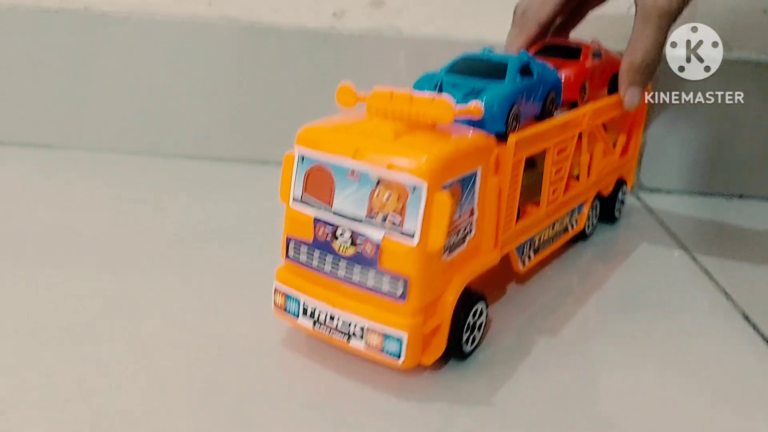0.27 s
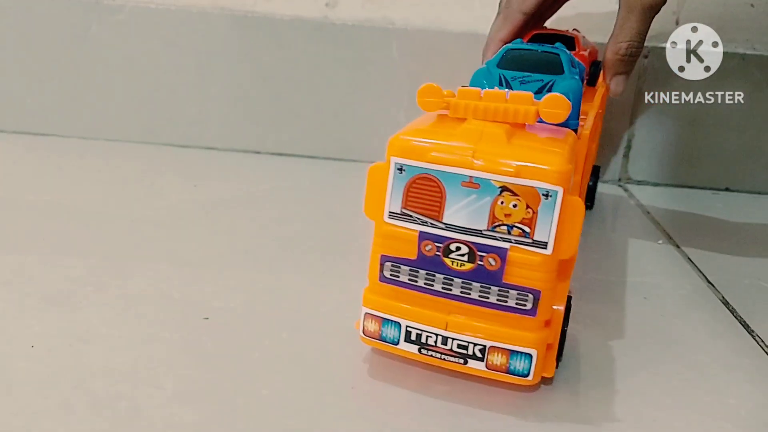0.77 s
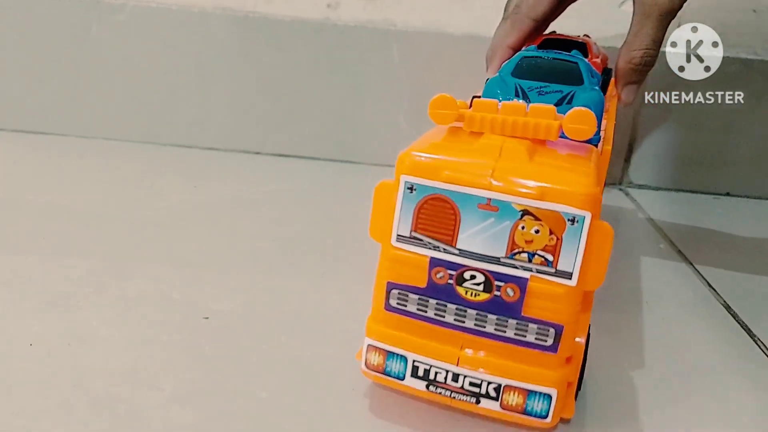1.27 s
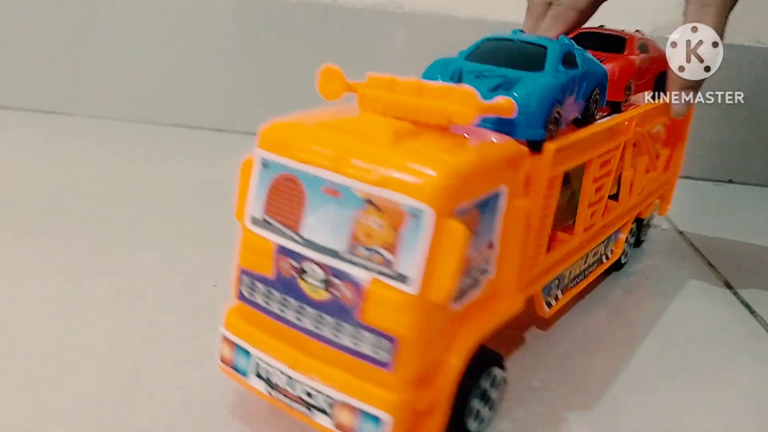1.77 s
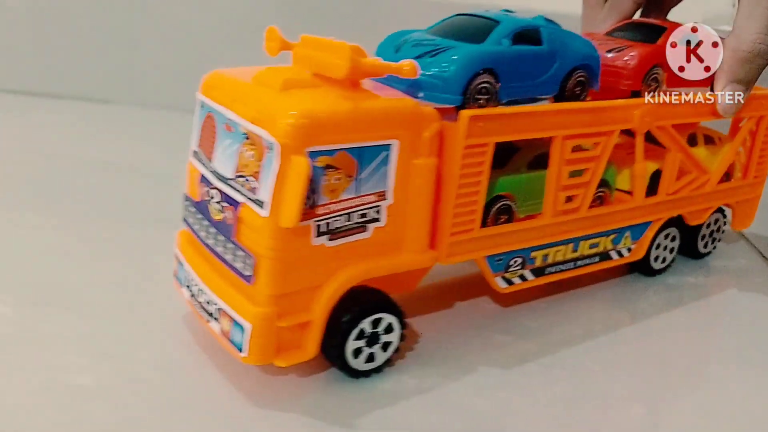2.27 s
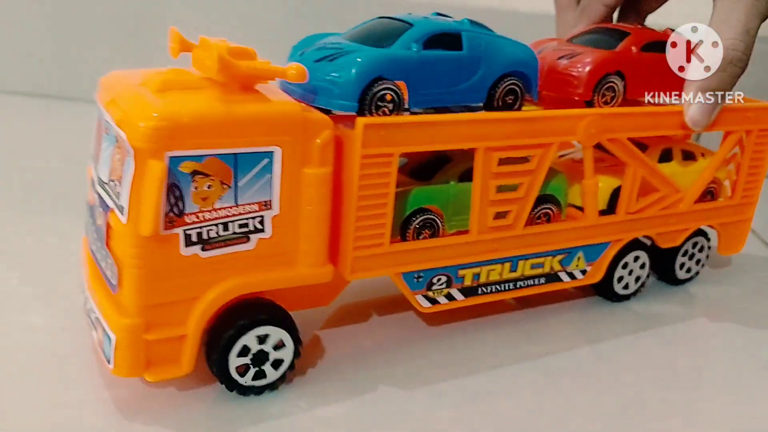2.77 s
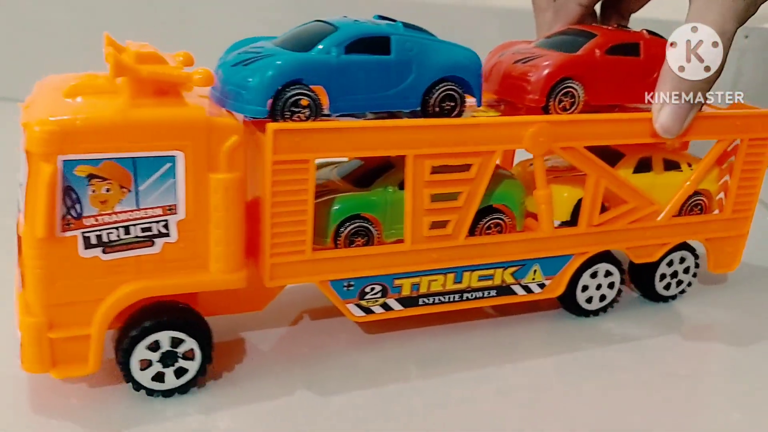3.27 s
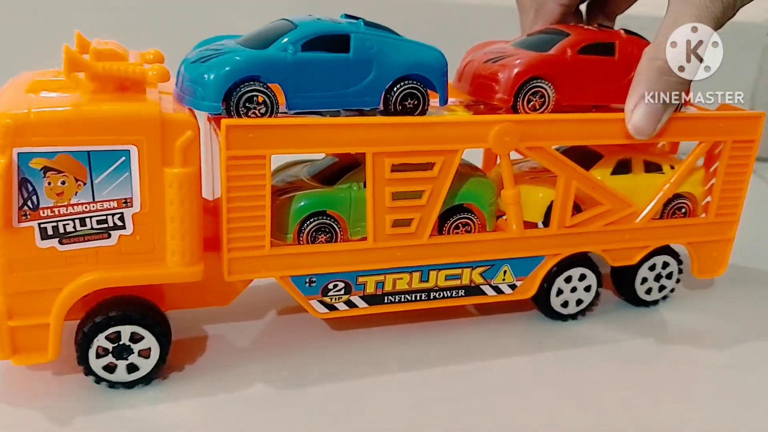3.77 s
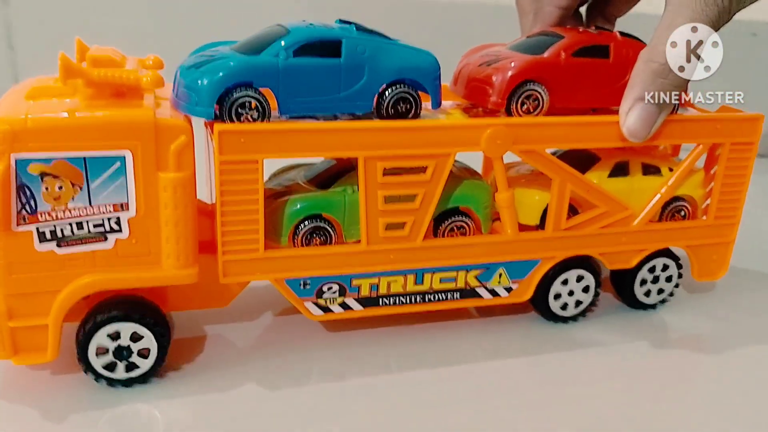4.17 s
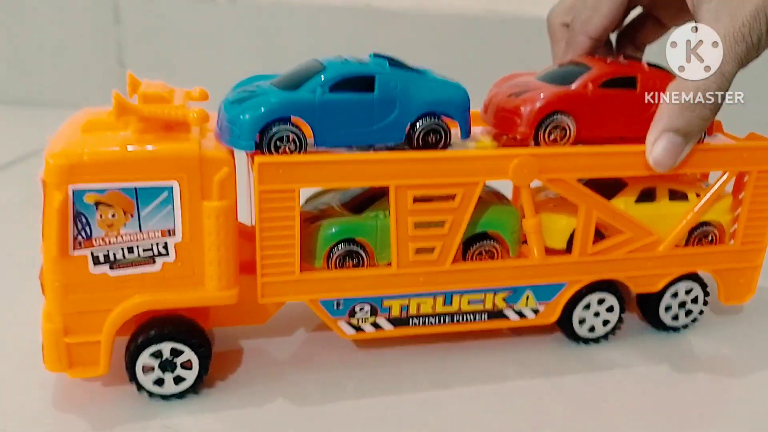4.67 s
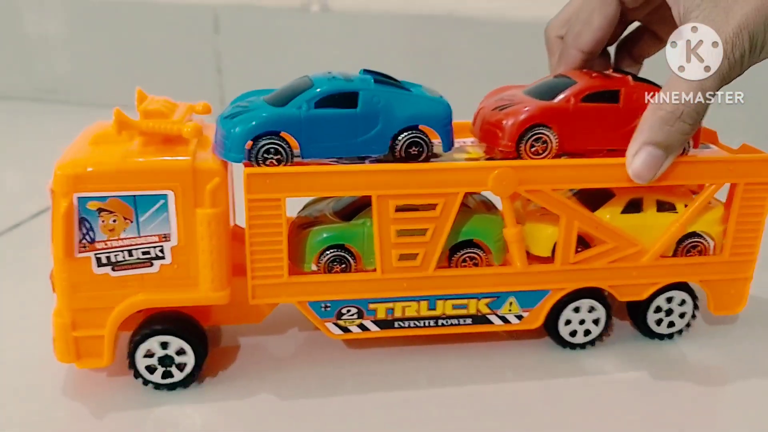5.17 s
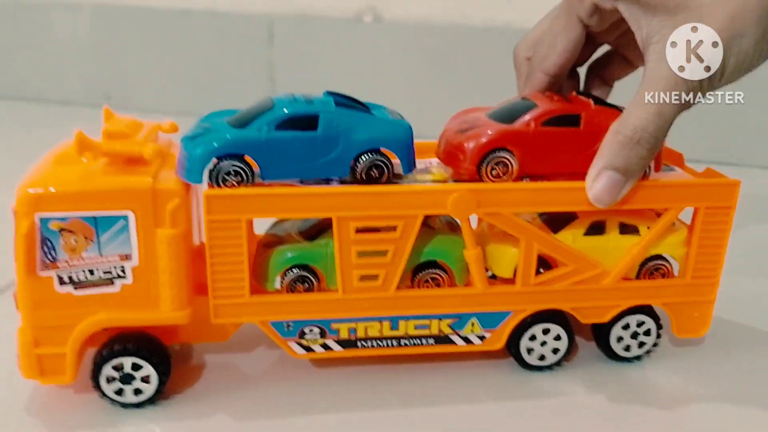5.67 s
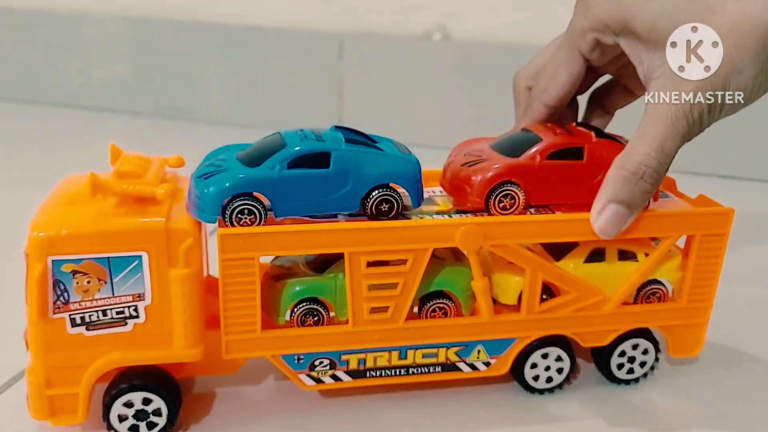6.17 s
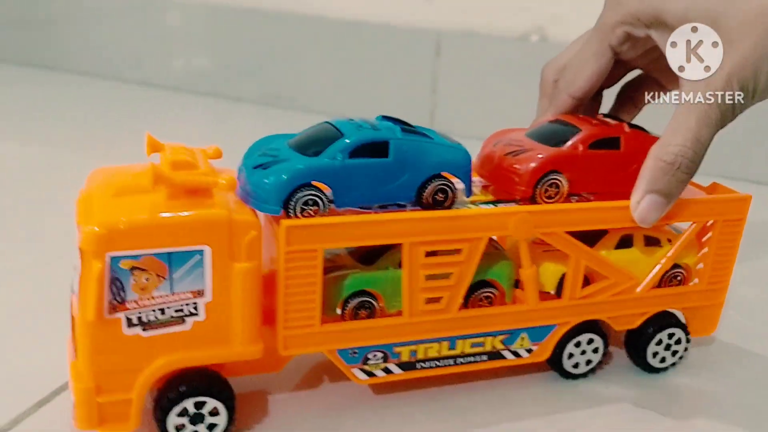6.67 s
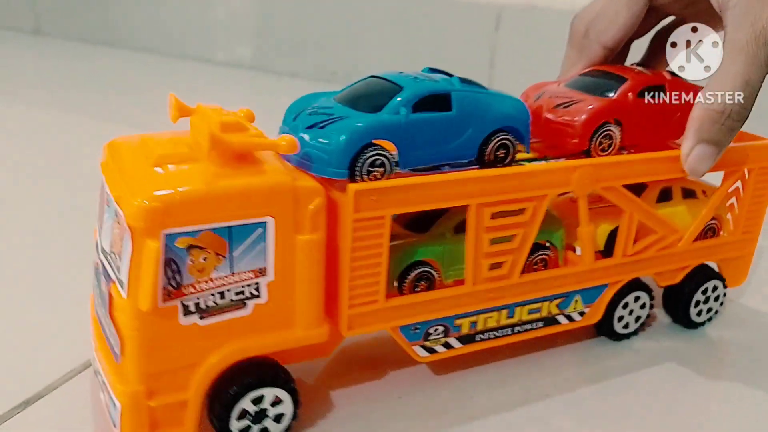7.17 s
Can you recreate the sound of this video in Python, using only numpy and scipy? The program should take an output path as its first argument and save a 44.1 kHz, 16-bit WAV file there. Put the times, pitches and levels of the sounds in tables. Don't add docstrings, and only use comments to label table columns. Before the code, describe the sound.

A hand-pushed plastic toy truck rolls close to a stereo pair of microphones on tiles in a small, live room. Soft wheel rumble and faint hiss continue throughout, over a low fan hum and irregular draught buffeting. Two knocks and scuffs open at 0.1 s, then the hitch creaks around 0.35-0.55. Thin high squeaks at about 1.0 lead into a rattling cluster from 1.2 to 1.6. Near 1.9-2.1 come the strongest creaks, squeaks and a knock; a sharp scuff and thump follow at 2.6, then more rattling to 3.2. A calmer stretch has a small high squeak at 3.5. A loud rising squeak at 4.1 precedes dense scuffs and a deep thump near 4.5. Car ticks gather around 4.9 and 5.6, with rattles until 6.2. Faint low squeaks follow around 6.4-6.6, then squeaks, thumps and a bright final clatter at 7.1-7.4.

```python
import sys
import numpy as np
from scipy import signal
from scipy.fft import rfft, irfft, next_fast_len
from scipy.io import wavfile
from scipy.ndimage import uniform_filter1d, map_coordinates

SR = 44100
rng = np.random.default_rng(int(sys.argv[2]) if len(sys.argv) > 2 else 0)


def how_loud(loudness_db):
    steps = np.asarray(loudness_db, float) / 20
    return 10 ** steps


def digitize_waveform(pressure):
    field = np.atleast_2d(pressure).T
    bounded = np.clip(field, -1, 1)
    quanta = np.round(bounded * 32767).astype(np.int16)
    wavfile.write(sys.argv[1], SR, quanta)


N = 327663
T = np.arange(N) / SR

# [t/s, peak/dB, ring f/Hz]
SHELL_TAPS = [(0.1004, -25, 2470), (0.1321, -26.5, 3900), (0.945, -33, 1510), (1.5566, -28, 3460),
              (1.425, -34, 4000), (2.9393, -30, 2150), (2.809, -31, 3000), (4.322, -31, 2600),
              (4.447, -33, 2620), (6.0746, -33, 5700), (1.272, -28, 2310), (1.7526, -32, 2600),
              (1.919, -24, 2300), (2.0354, -34, 2230), (2.556, -23, 2110), (2.731, -33, 2530),
              (2.817, -25, 1780), (3.17, -28, 2430), (4.035, -29, 2920), (4.2318, -28, 1730),
              (4.4754, -23.5, 3040), (4.6887, -30, 2000), (5.5134, -41, 1600), (6.102, -29, 2080),
              (6.204, -28, 2340), (6.9166, -32, 2980), (7.0983, -31, 2680)]
# [t/s, peak/dB, ring f/Hz]
CAR_TICKS = [(1.211, -37, 3820), (1.483, -30, 3770), (3.0774, -26, 3620), (3.454, -37, 3600),
             (4.5755, -25, 3250), (4.855, -29.5, 2980), (4.912, -27, 3210), (5.009, -31, 3040),
             (5.364, -27, 3000), (5.5865, -30, 4130), (5.623, -28.5, 3050), (5.753, -28, 5700),
             (5.9728, -29, 3170), (6.706, -28, 3570), (7.029, -30, 6600), (7.139, -25, 3120),
             (7.24, -27, 3060), (7.269, -19, 3860)]


def unit(x):
    return x / np.sqrt(np.mean(x ** 2) + 1e-20)


def along(points, hz):
    f, v = np.transpose(points)
    return np.interp(np.log(hz + 1), np.log(f + 1), v)


def curve(rows):
    s, value = np.transpose(rows)
    return np.interp(T, s, value)


def wobble(rate_hz, count=N):
    knots = rng.standard_normal(int(count * rate_hz / SR) + 4)
    return map_coordinates(knots, [T[:count] * rate_hz])


def filtered(x, response):
    m = next_fast_len(N + 8192)
    return irfft(rfft(x, m) * response(np.fft.rfftfreq(m, 1 / SR)), m)[..., :N]


def shape(spectrum):
    return lambda hz: how_loud(along(spectrum, hz))


def steep_resonances(modes):
    def gain(f):
        total = 0
        for k, (centre, width, db) in enumerate(modes):
            total = total + (-1) ** k * how_loud(db) * 1j * f * width / (centre ** 2 - f ** 2 + 1j * f * width)
        return np.abs(total) ** 1.5
    return gain


def rush(gain, patchy_db, gritty_db=0):
    # [f/Hz, correlation]
    likeness = [(20, .84), (60, .55), (90, .35), (130, .66), (260, .66), (550, .68), (1150, .52),
                (2400, .45), (5020, .25), (10500, -.2)]
    grit = how_loud(gritty_db * wobble(900))
    z = signal.stft(grit * rng.standard_normal((2, N)), nperseg=512)[2]
    field = uniform_filter1d(rng.standard_normal(z.shape[1:]), size=5, axis=0)
    field = uniform_filter1d(field, size=5, axis=1)
    pair = signal.istft(z * how_loud(patchy_db * unit(field)), nperseg=512)[1][:, :N]

    def mid_side_gain(hz):
        angle = np.arccos(np.clip(along(likeness, hz), -1, 1)) / 2
        return gain(hz) * np.array([np.cos(angle), np.sin(angle)])

    mid, side = filtered(pair, mid_side_gain)
    return unit(np.array([mid + side, mid - side]))


def fan():
    # [f/Hz, level/dB, left minus right/dB]
    motor = (47.65, -26, -.3)
    # [t/s, level/dB]
    gusts = [(0, -27), (.7, -27), (1, -24), (1.5, -26), (2, -23.5), (3.6, -23.5), (4, -26), (4.6, -26),
             (4.9, -22.5), (5.5, -25), (6.3, -27), (6.9, -27), (7.15, -23), (7.43, -25)]
    # [f/Hz, density/dB per Hz]
    gust_spectrum = [(6, -25), (12, -8), (18, -1.5), (24, 0), (32, -3), (40, -10), (52, -14), (60, -40),
                     (80, -120)]
    # [f/Hz, level/dB]
    draught_spectrum = [(25, -120), (38, -25), (52, 0), (64, -1), (78, -3), (90, -8), (110, -13),
                        (140, -30), (200, -120)]
    hz, hum_db, lean_db = motor
    phase = 2 * np.pi * np.cumsum(hz + .1 * wobble(3)) / SR
    hum = how_loud(hum_db + 3 + 1.4 * wobble(2.5)) * np.sin(phase)
    buffet = how_loud(curve(gusts)) * rush(shape(gust_spectrum), patchy_db=0.5)
    draught = how_loud(-34.5 + 1.2 * wobble(5)) * rush(shape(draught_spectrum), patchy_db=1.5)
    return hum * how_loud([[lean_db / 2], [-lean_db / 2]]) + buffet + draught


def rolling():
    # [t/s, wheel rumble/dB]
    push = [(0.0, -40), (1.34, -40), (1.47, -39.5), (2.19, -41.5), (2.4, -39), (2.59, -37), (3.0, -39.5),
            (3.79, -39.5), (4.07, -36.5), (4.45, -39.5), (4.95, -39.5), (5.63, -39.5), (6.31, -40.5),
            (7.06, -40), (7.22, -36.5), (7.43, -44)]
    # [f/Hz, density/dB per Hz]
    wheel_spectrum = [(56, -63), (95, -7.5), (124, -6), (187, -5.5), (236, -12.5), (313, -11), (365, -17),
                      (645, -20), (839, -23), (1200, -26), (1300, -28.5), (1690, -36.5), (2860, -120)]
    # [f/Hz, level/dB]
    tile_spectrum = [(300, -120), (700, -22), (1150, -1), (2000, -2), (3200, -2), (4100, -3.5), (5000, -7),
                     (6300, -8.5), (8000, -10), (10000, -13), (11000, -20)]
    rumble_db = curve(push)
    hiss_db = -49 + 0.87 * (rumble_db - rumble_db.mean())
    rumble = rush(shape(wheel_spectrum), patchy_db=2, gritty_db=2.0)
    hiss = rush(shape(tile_spectrum), patchy_db=2.5, gritty_db=-0.24)
    return how_loud(rumble_db + 0.97 * wobble(13)) * rumble + how_loud(hiss_db + 0.81 * wobble(8.7)) * hiss


def rubbed(table, width, level_db):
    out = np.zeros((2, N))
    for s, length_s, hz, glide_hz, db in table:
        n = round(length_s * SR)
        u = np.arange(n) / n
        phase = 2 * np.pi * np.cumsum(hz + glide_hz * u) / SR
        a, b, c, d = (wobble(width * hz, count=n) for _ in range(4))
        mid = a * np.sin(phase) + b * np.cos(phase)
        side = c * np.sin(phase) + d * np.cos(phase)
        swell = how_loud(db + level_db) * np.clip(np.minimum(u / .12, (1 - u) / 0.28), 0, 1)
        start = round(s * SR)
        out[:, start:][:, :n] += (swell * [mid + .5 * side, mid - .5 * side])[:, :N - start]
    return out


def shell_rings():
    # [start t/s, length/s, f/Hz, glide/Hz, peak/dB]
    truck_rings = [(.02, 0.024, 3100, -200, -43), (1.21, .04, 8240, -100, -44),
                   (1.225, 0.072, 5780, 52, -42), (1.275, .09, 2010, -250, -39),
                   (1.3, .09, 8400, -500, -46), (1.4, .06, 3810, 0, -49), (1.48, 0.032, 4970, 0, -49),
                   (1.485, 0.018, 2600, 0, -42), (1.558, 0.033, 1950, -2, -42),
                   (1.99, 0.049, 1860, -50, -39), (2.13, 0.022, 1445, 398, -47),
                   (2.575, 0.043, 6360, -200, -45), (2.732, 0.028, 2500, -100, -44),
                   (2.74, .03, 7850, 0, -47), (2.765, 0.051, 5670, 0, -47), (2.812, .065, 1750, 48, -38),
                   (2.815, .05, 2870, -200, -41), (2.86, .06, 7940, 0, -43), (2.9, 0.058, 6200, 0, -43),
                   (2.955, .035, 4700, 2, -48), (3.01, .035, 3100, -2, -50), (3.03, .03, 5940, 0, -44),
                   (4.235, .04, 3470, 0, -47), (4.248, .025, 2000, 0, -35), (4.325, .075, 1910, -100, -42),
                   (4.33, .07, 8460, -200, -42), (4.33, 0.07, 2900, 0, -41), (4.45, .045, 1906, -100, -38),
                   (4.59, .03, 8400, 0, -54), (5.76, .035, 2030, -2, -38), (5.78, 0.044, 4050, -100, -42),
                   (5.82, 0.027, 2090, 0, -40), (5.86, 0.068, 2980, 100, -38),
                   (7.275, 0.057, 1910, -2, -40.5), (7.36, .065, 2000, -100, -40.5),
                   (7.37, 0.044, 3000, -3, -39), (7.35, 0.079, 8350, 0, -50)]
    # [start t/s, length/s, f/Hz, glide/Hz, peak/dB]
    deck_rings = [(6.025, .055, 5650, 50, -47), (5.73, .04, 6450, -100, -45),
                  (5.752, .035, 5600, -100, -43), (2.81, .06, 4700, 50, -46), (2.88, .03, 3950, 0, -44),
                  (6.1, .03, 8300, 0, -45), (.49, .07, 3100, 0, -46), (.355, .04, 3400, -50, -46),
                  (3.3, .055, 4750, 0, -50), (3.3, .1, 7750, 100, -51), (3.07, .03, 3500, 0, -43),
                  (6.08, .05, 2060, 0, -44), (6.205, .04, 2300, 80, -46), (2.13, .025, 1900, 0, -46),
                  (1.2, .035, 1900, 0, -45), (4.59, .04, 3200, 0, -50), (5.84, .04, 680, 0, -46),
                  (4.45, .03, 5600, 0, -45)]
    return rubbed(truck_rings + deck_rings, width=.12, level_db=-4)


def contacts():
    # [t/s, strength/dB, pace (1 = usual spacing)]
    wheel_turns = [
        (-.297, -2, 0.98),
        (1.221, 0.4, 1.013),
        (2.751, -0.4, 0.96),
        (4.258, .7, 0.99),
        (5.776, 0.45, 0.944),
        (7.281, -0.5, 1.2),
    ]
    # [t after its start/s, level/dB, hollow/dB, sharp/dB, rise/s]
    turn_shakes = [
        (0, -41, -5.5, 3, 0.029),
        (.06, -46, -21, 2.5, 0.045),
        (.115, -39, 0, 1, 0.046),
        (0.21, -42, -3.5, 2.5, .022),
        (0.344, -42, -2.5, 2, 0.02),
    ]
    # [t/s, level/dB, brightness/dB, rise/s]
    single_scuffs = [(0.101, -42.5, -3, 0.0036), (.136, -41, -6.5, 0.0024), (0.505, -43, -34, 0.023),
                     (.672, -53, 5, 0.016), (.748, -68, 18, 0.063), (.948, -52, -1, .007),
                     (1.04, -69, 12, .011), (1.082, -69, 14, .008), (1.491, -43, -1.5, 0.014),
                     (1.775, -50, -19, 0.021), (1.967, -46, -4, 0.034), (2.039, -40, -5, 0.013),
                     (2.137, -49.5, 3, 0.011), (2.557, -38.5, 2, 0.0092), (2.624, -53, 3, 0.057),
                     (2.837, -43, -16, 0.012), (3.328, -58, 10, 0.03), (1.33, -43, -6, .03),
                     (4.365, -44, -8, .03), (5.885, -45, -6, .02), (3.459, -48, -1, .0053),
                     (3.517, -62, 15.5, 0.016), (4.113, -61, 4, 0.017), (4.693, -40, -18, 0.0068),
                     (4.914, -41.5, 1, 0.011), (5.379, -61.5, 15, .01), (5.606, -54.5, 8.5, 0.03),
                     (6.12, -43, 3, 0.0072), (6.209, -42, -14, 0.0096), (6.594, -48.5, -0.5, 0.016),
                     (7.118, -51, 7, 0.034), (7.275, -38, 4.5, 0.0047), (7.412, -54, -6, 0.031)]
    # [t/s, level/dB, brightness/dB, fall/s]
    trailing_drags = [(1.674, -46.5, -16, .04), (1.995, -43, -9, 0.045), (2.413, -52, -2.5, 0.043),
                      (3.008, -52, 5, 0.14), (3.174, -51.5, -5, .042), (4.038, -47.5, 4.5, 0.073),
                      (5.02, -56.5, 5, 0.093), (5.468, -64, 13, 0.045), (5.516, -53, 4.5, 0.025),
                      (6.708, -52, 0, 0.024), (6.878, -61, 6, .1), (7.031, -49, 2.5, 0.012),
                      (7.29, -38.5, -2, 0.019), (2.45, -69, -25, 0.09), (6.079, -42.5, 4, 0.012),
                      (.36, -50, -22, .05), (4.255, -43, -25, 0.014), (1.563, -45, -2, .02),
                      (4.52, -54, 3, .05), (4.582, -51, 0, .02), (.455, -56, 6, .008), (2.57, -47, -2, .03),
                      (5.93, -53, 3, .04), (6.115, -50, -20, .02)]

    def fall_s(rise_s):
        return 0.0081 + 0.37 * rise_s

    def hollow_db(bright_db):
        return -2 - 0.11 * bright_db

    rows = []
    for s, turn_db, pace in wheel_turns:
        for after_s, db, low_db, high_db, rise_s in turn_shakes:
            rows.append((s + pace * after_s, turn_db + db, low_db, high_db, rise_s, fall_s(rise_s)))
    for s, db, bright_db, rise_s in single_scuffs:
        rows.append((s, db, hollow_db(bright_db), bright_db, rise_s, fall_s(rise_s)))
    for s, db, bright_db, tail_s in trailing_drags:
        rows.append((s, db, hollow_db(bright_db), bright_db, 0.017, tail_s))
    return rows


def scuffs():
    # [f/Hz, width/Hz, level/dB]
    hollow_modes = [(1540, 770, -4), (1850, 250, 2.5), (2250, 560, -4)]
    # [f/Hz, width/Hz, level/dB]
    body_modes = [(2467, 220, -3.5), (2980, 620, -2.5), (3520, 680, 0), (4254, 1350, -5.5)]
    # [f/Hz, width/Hz, level/dB]
    sharp_modes = [(4680, 1050, -4.5), (6020, 1200, -2), (6680, 620, -0.5), (8210, 1350, -4),
                   (10350, 1400, -8.5)]
    # [f/Hz, width/Hz, level/dB]
    chassis_modes = [(300, 120, 0), (620, 250, -4), (1000, 300, -7)]
    tap_times = [tap[0] for tap in SHELL_TAPS + CAR_TICKS]
    power = np.zeros((4, N))
    for s, db, hollow_db, sharp_db, rise_s, fall_s in contacts():
        span = slice(*np.searchsorted(T, [s - 3 * rise_s, s + 6 * fall_s]))
        t = T[span]
        start = np.exp(-.9 * (np.abs(s - t) / rise_s) ** 2.8)
        earliest = s - max(.025, 1.3 * rise_s)
        lead = [tap for tap in tap_times if earliest < tap < s + .003]
        if lead:
            start = np.where(t < min(lead), .14 * start, np.maximum(start, .52))
        finish = np.exp(-.9 * (np.abs(t - s) / fall_s) ** 1.5)
        group_db = [[db + hollow_db], [db], [db + sharp_db], [db - 7.0]]
        power[:, span] += how_loud(group_db) ** 2 * np.where(t < s, start, finish)
    out = np.zeros((2, N))
    for p, modes in zip(power, (hollow_modes, body_modes, sharp_modes, chassis_modes)):
        out += np.sqrt(p) * rush(steep_resonances(modes), patchy_db=2.2, gritty_db=3.7)
    return out


def blows(table, crack_db, attack_s):
    out, t = np.zeros(N + SR), np.arange(SR // 4) / SR
    for s, db, hz, t60_s in table:
        ring = np.sin(2 * np.pi * hz * t) * how_loud(-60 * t / t60_s) * (1 - np.exp(-t / attack_s))
        crack = how_loud(crack_db - 60 * t / 0.0039) * rng.standard_normal(len(t))
        out[round(s * SR):][:len(t)] += how_loud(db) * (ring + crack)
    return out[:N]


def taps():
    rows = [(*tap, .018) for tap in SHELL_TAPS + CAR_TICKS]
    return how_loud(-6) * blows(rows, crack_db=-7, attack_s=.0002)


def thumps():
    # [t/s, peak/dB, f/Hz, t60/s]
    floor_blows = [(.91, -17, 248, 0.049), (2.609, -11, 287, 0.1), (5.66, -19, 205, .1),
                   (5.27, -23, 300, .05), (7.07, -18, 105, .12), (2.617, -17.5, 710, 0.036),
                   (4.468, -2, 60, 0.1), (1.46, -17, 105, .12), (4.2, -24, 480, .06), (7.29, -22, 220, .08),
                   (7.07, -8.5, 22.5, 0.4), (7.272, -35, 307, 0.04), (2.4, -23.5, 148, 0.094),
                   (2.56, -22, 420, .04), (2.622, -19, 478, .03), (2.63, -20, 910, 0.029),
                   (.34, -22, 188.3, 0.088), (1.38, -20.5, 106, 0.11), (1.9, -15, 85, 0.14),
                   (3.55, -22.5, 191, 0.105), (4.086, -19, 103, 0.122), (4.43, -18, 195, 0.077),
                   (5.0, -16.5, 97, 0.18), (5.44, -21, 278, 0.073), (5.73, -18, 97, .1)]
    return blows(floor_blows, crack_db=-56, attack_s=0.017)


def squeal(table, jitter, flutter_db, overtones_db=(), hold=0.5):
    out = np.zeros(N)
    for s, length_s, hz, glide_hz, db in table:
        n = round(length_s * SR)
        u = np.arange(n) / n
        level_db = db + np.interp(u, [0, 0.32, hold, 1], [-2.5, 0, 0, -13])
        gate = np.clip(np.minimum(u, 1 - u) * length_s / 0.0025, 0, 1)
        pitch_hz = (hz + glide_hz * u) * (1 + jitter * wobble(300.7, count=n))
        phase = 2 * np.pi * np.cumsum(pitch_hz) / SR
        for k, partial_db in enumerate([0, *overtones_db]):
            level = how_loud(level_db + partial_db + flutter_db * wobble(121, count=n))
            out[round(s * SR):][:n] += gate * level * np.sin((k + 1) * phase)
    return out


def hitch_creaks():
    # [start t/s, length/s, f/Hz, glide/Hz, peak/dB]
    hitch_slips = [
        (.35, 0.036, 1125, 55, -43),
        (.383, 0.045, 1085, -70, -37.5),
        (.474, 0.097, 1082, -4, -36),
        (1.917, .04, 1150, -45, -37.5),
        (1.945, 0.062, 1094, -36, -33),
        (4.7, 0.047, 1160, 17, -47),
    ]
    return squeal(hitch_slips, jitter=0.016, flutter_db=2.8, overtones_db=[-1, -15, -24], hold=.75)


def axle_squeaks():
    # [start t/s, length/s, f/Hz, glide/Hz,
    # peak/dB]
    rear_slips = [(1.018, 0.023, 5700, 88, -37), (1.03, 0.095, 6360, -83, -45.5),
                  (1.07, 0.092, 5770, 42, -46.5), (1.175, .022, 6460, -50, -46.5),
                  (1.193, .012, 5710, 0, -46), (1.945, 0.062, 3280, -60, -42), (1.69, 0.033, 1225, 36, -40),
                  (2.036, .022, 2080, 40, -42), (2.054, .02, 2170, 30, -34), (2.07, .035, 2260, -60, -38.5),
                  (2.042, 0.038, 3250, 4, -39), (1.982, 0.031, 2930, -30, -39),
                  (.495, 0.071, 3050, -80, -48), (.54, .045, 3230, 50, -51), (1.915, .028, 2310, -40, -40),
                  (.352, .035, 2270, 70, -40), (.388, .025, 2100, -40, -46), (2.0, .025, 2480, 60, -43),
                  (1.945, .03, 4330, 0, -55), (2.345, .02, 8930, 0, -52), (.5, 0.056, 1695, -24, -44),
                  (2.615, 0.19, 5760, -20, -50), (4.05, 0.068, 6340, 200, -49),
                  (4.215, 0.043, 6400, 2, -44.5), (5.59, 0.092, 6320, -38, -46.5),
                  (6.18, 0.056, 6680, -27, -50), (6.375, .04, 2260, -10, -42), (6.43, 0.048, 2490, 35, -52),
                  (6.55, 0.056, 2200, -32, -44), (7.118, 0.064, 6300, -31, -41.5),
                  (7.025, 0.057, 6660, -38, -51)]
    # [start t/s, length/s, f/Hz, glide/Hz, peak/dB]
    car_slips = [
        (.635, 0.11, 6900, -30, -52),
        (3.543, 0.05, 6930, -10, -38),
        (6.215, .065, 1185, 20, -42.5),
        (6.432, .033, 1250, 20, -39),
    ]
    # [start t/s, length/s, f/Hz, glide/Hz, peak/dB]
    front_slips = [
        (1.34, 0.059, 3870, 70, -44),
        (4.068, 0.092, 4070, 198, -35.5),
        (7.092, 0.035, 4070, 90, -42.5),
    ]
    out = squeal(rear_slips, jitter=.019, flutter_db=3.8)
    out += squeal(car_slips, jitter=.005, flutter_db=2.5)
    return out + squeal(front_slips, jitter=.016, flutter_db=4.5, overtones_db=[-17])


def squeak_rasps():
    # [start t/s, length/s, f/Hz, glide/Hz, peak/dB]
    halos = [(1.03, .11, 6150, -150, -44), (1.075, .07, 5700, 0, -46), (1.918, .09, 2300, -60, -42),
             (1.94, .07, 3280, -30, -44), (2.0, .06, 1850, -50, -43), (.352, .05, 3380, -60, -46),
             (6.54, .07, 2200, 0, -47), (4.09, .09, 4150, 120, -44)]
    return rubbed(halos, width=.1, level_db=-4)


def room(x):
    # [f/Hz, t60/s]
    decay = [(200, .35), (2000, .28), (10000, .15)]
    hz, t, z = signal.stft(rng.standard_normal((2, SR // 2)), SR, nperseg=256)
    tail = signal.istft(z * how_loud(-60 * t / along(decay, hz)[:, None]), SR, nperseg=256)[1]
    delayed = np.pad(x, (150, 0))[None]
    return signal.fftconvolve(delayed, tail / np.linalg.norm(tail[0]), axes=1)[:, :N]


def scene():
    near = axle_squeaks() + hitch_creaks() + taps()
    scuff = scuffs() + shell_rings()
    wet = room(how_loud(-10.5) * near + how_loud(-6.0) * scuff.mean(0))
    return near + scuff + wet + thumps() + rolling() + fan() + squeak_rasps()


def dropouts(x):
    # [f/Hz, share missing 0-1]
    thin_loss = [(4200, 0), (5000, .06), (6400, .1), (7200, .28), (8200, .16), (9200, .45), (9900, .16),
                 (10400, .25), (10850, .65), (11050, 1.5)]
    # [f/Hz, share missing 0-1]
    broad_loss = [(7500, -.01), (8500, .05), (9500, .1), (10500, .16)]
    hz, _, z = signal.stft(x, SR, nperseg=1024)
    size = np.abs(z).mean(0)
    treble_db = 20 * np.log10(size[120:250].mean(0) + 1e-20)
    quiet = np.clip(1 - (treble_db - np.median(treble_db)) / 25, .9, 1.5)
    keep = np.ones(size.shape, bool)
    for bins, frames, loss in [(4, 10, thin_loss), (20, 5, broad_loss)]:
        field = rng.standard_normal((len(hz) // bins + 1, size.shape[1]))
        field = uniform_filter1d(field, size=frames, axis=1)
        rank = field.argsort(None).argsort().reshape(field.shape) / field.size
        rank = np.repeat(rank, bins, axis=0)
        keep &= rank[:len(hz)] > along(loss, hz)[:, None] * quiet
    keep |= (size > 3.5 * how_loud(treble_db)) & (hz[:, None] < 10000)
    return signal.istft(z * np.maximum(keep, how_loud(-36)), SR, nperseg=1024)[1][:, :N]


def band_limit(x):
    return signal.sosfilt(signal.butter(12, 11110, fs=SR, output="sos"), x)


def record(dry):
    # [f/Hz, left minus right/dB]
    lean = [(30, 3), (75, 3), (125, -.2), (300, .2), (600, -.8), (1200, -2), (2400, -1.5), (5000, -2.3),
            (10000, -2)]

    def colour(hz):
        return how_loud(along(lean, hz) / 2 * np.array([[1], [-1]])) * (hz < 11050)

    return band_limit(dropouts(filtered(dry, colour)))


dry = scene()
out = record(dry)
digitize_waveform(out)
```